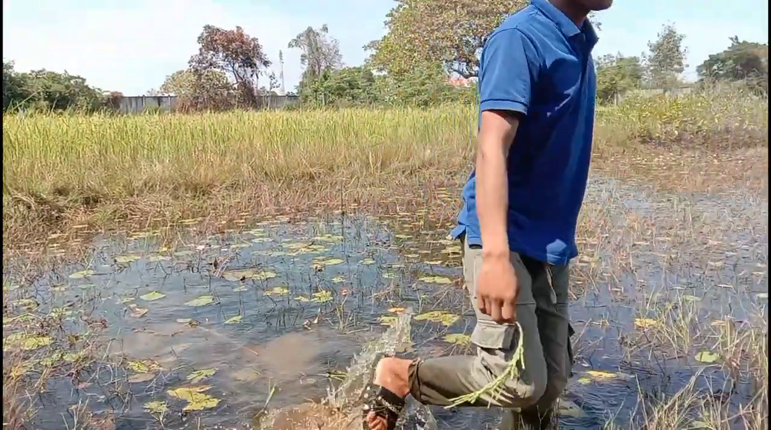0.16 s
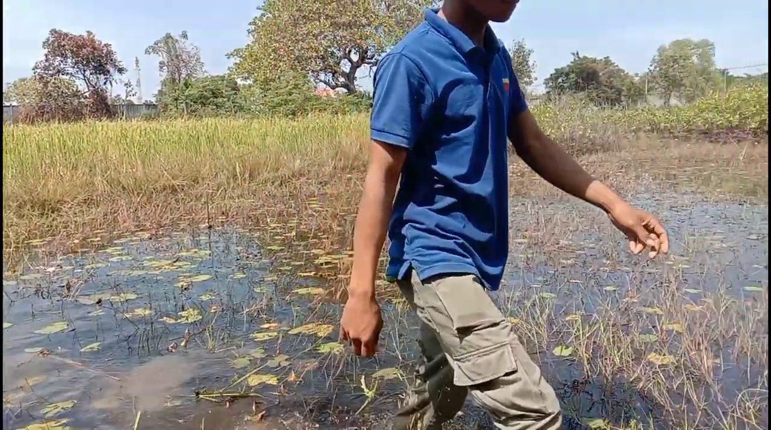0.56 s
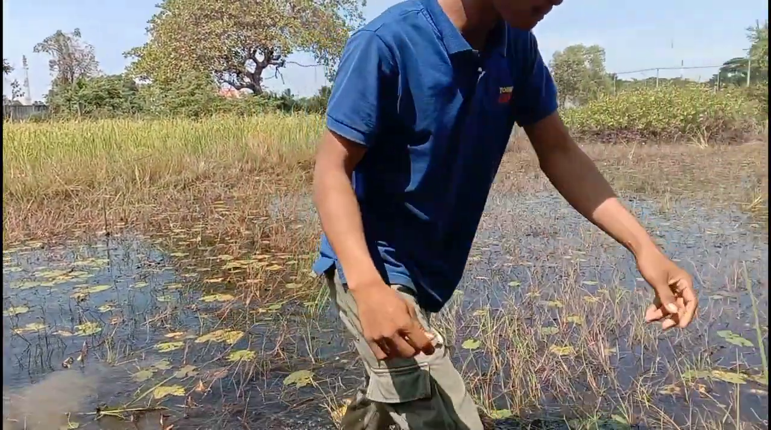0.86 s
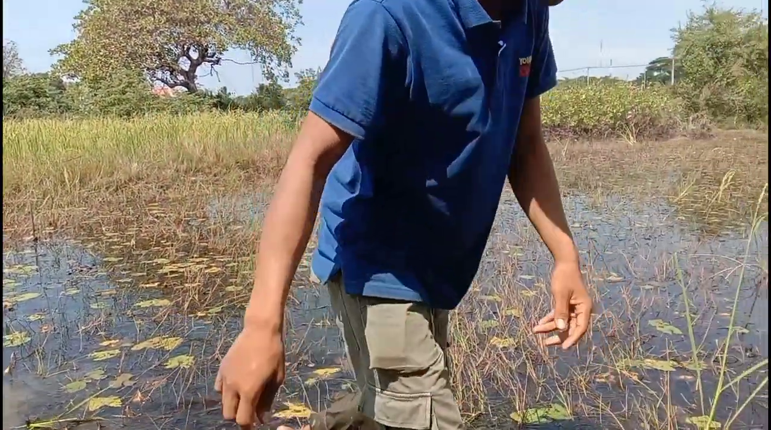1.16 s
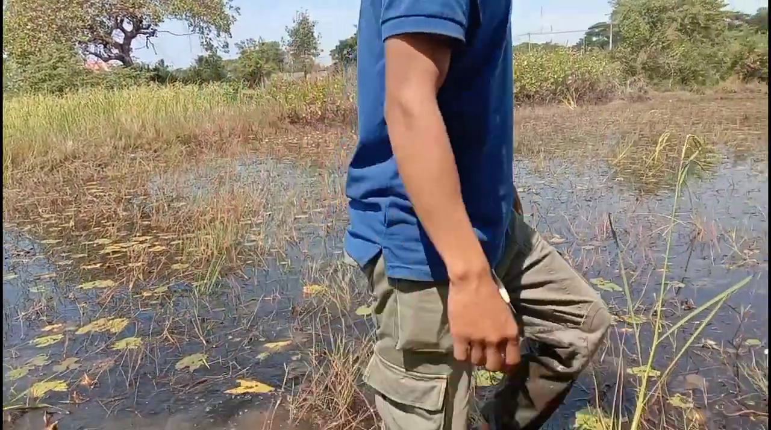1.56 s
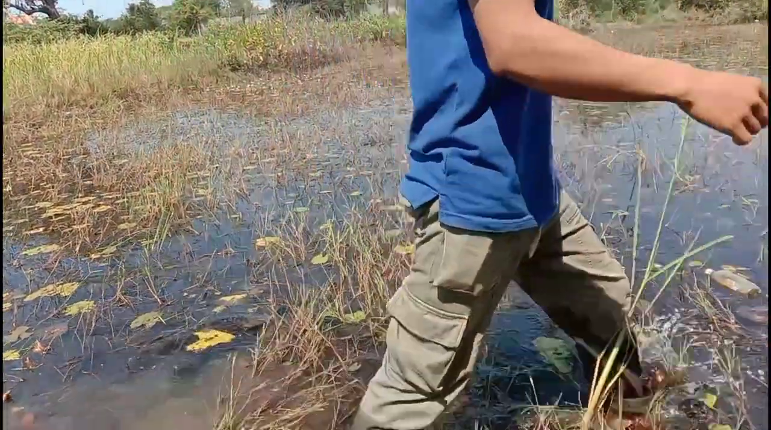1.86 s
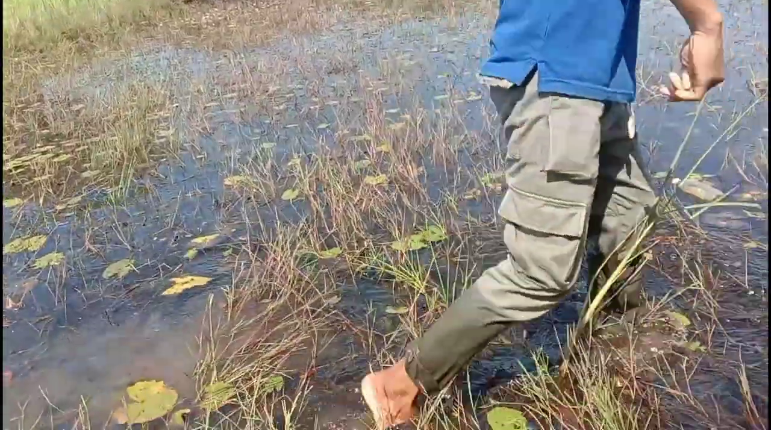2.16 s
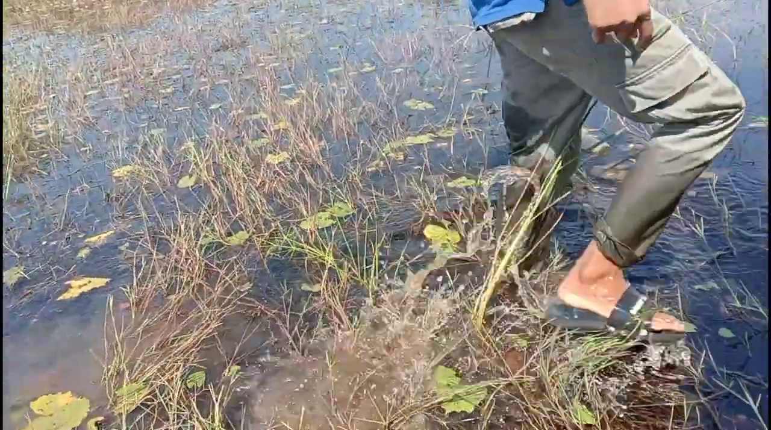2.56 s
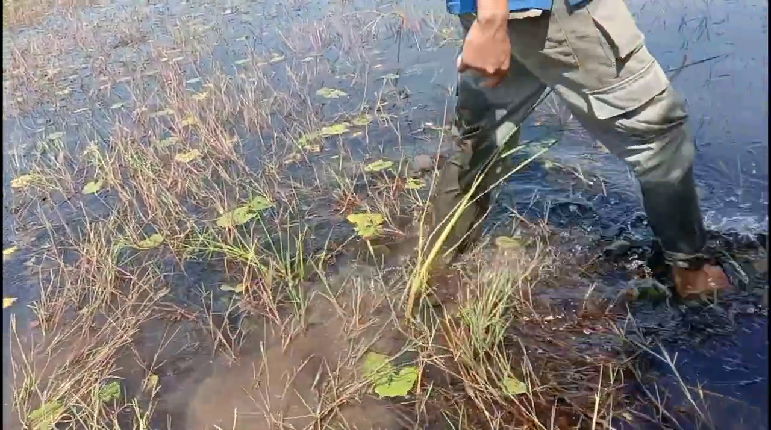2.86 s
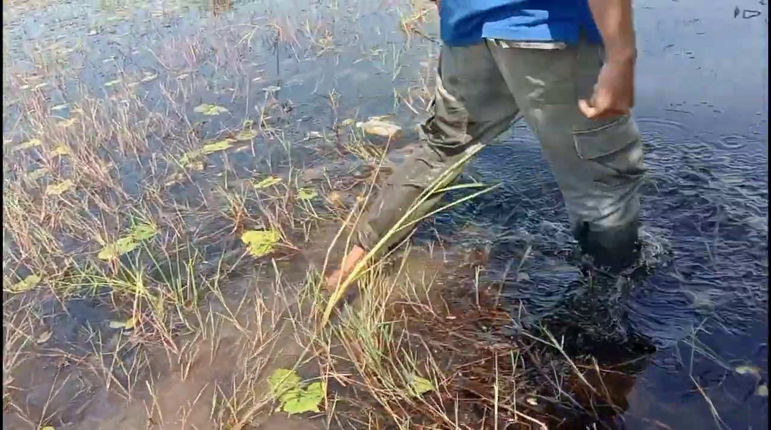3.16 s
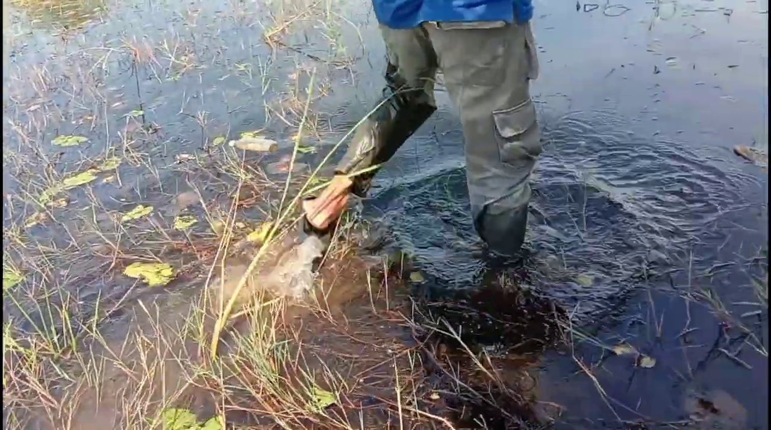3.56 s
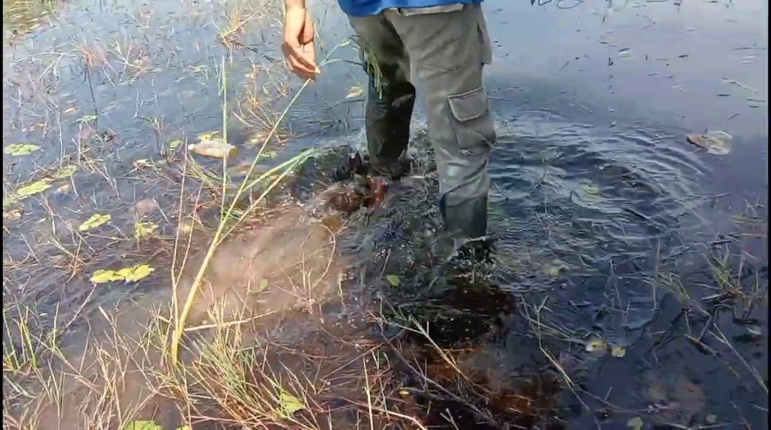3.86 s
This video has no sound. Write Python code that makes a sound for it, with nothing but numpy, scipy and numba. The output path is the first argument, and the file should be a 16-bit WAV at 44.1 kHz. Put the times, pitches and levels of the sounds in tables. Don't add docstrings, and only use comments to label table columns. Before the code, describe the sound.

Irregular wading splashes in a flooded grassy field: an early surge, smaller sloshes, then a strong bubbly plunge past the middle and lighter drips, heard a couple of metres away, dry and open, with slightly bright phone sound.

```python
import sys
import numpy as np
from scipy import signal
from scipy.fft import rfft, irfft
from scipy.io import wavfile
from scipy.ndimage import uniform_filter1d
from numba import njit

SR = 44100
rng = np.random.default_rng(int(sys.argv[2]) if len(sys.argv) > 2 else 0)


def to_linear_factor(level_db):
    exponent = np.asarray(level_db, float) / 20
    return 10 ** exponent


def persist_wave(psi):
    counts = np.round(np.clip(psi, -1, 1) * 32767).astype(np.int16)
    wavfile.write(sys.argv[1], SR, np.atleast_2d(counts).T)


N = 176400

# time_s, level_db
FLOW = [(0, -66), (0.108, -58), (.15, -40.5), (.45, -31.5), (.66, -38.5), (.8, -36), (.89, -40.5),
        (1.17, -37.5), (1.269, -47.5), (1.6, -32.5), (1.97, -39), (2.29, -45), (2.339, -38.5), (2.7, -30),
        (2.84, -35.5), (3.33, -44.5), (3.52, -47), (3.78, -33)]
# start_s, level_db, fade_db_per_s
PLUNGES = [(0, -51.5, 187), (0.113, -32.5, 27), (0.732, -34, 52), (.95, -42, 29), (1.296, -41, 14),
           (1.72, -35, 197), (1.94, -40, 100), (2.091, -38, 74), (2.314, -31, 35), (2.72, -42.5, 144),
           (2.97, -43, 16), (3.546, -38.5, 1)]
# start_s, peak_db, pitch_hz
GULPS = [(0.114, -27, 783), (0.129, -21, 852), (0.154, -25, 513), (0.242, -23, 610), (.66, -45, 910),
         (0.739, -22.5, 860), (0.761, -21.5, 900), (1.294, -35, 1040), (1.323, -31, 680), (1.474, -31, 456),
         (1.52, -26.5, 628), (1.681, -22.5, 950), (1.725, -22, 538), (1.744, -27, 618), (1.946, -19.5, 959),
         (2.096, -31.5, 795), (2.318, -17.5, 943), (2.337, -9.5, 686), (2.357, -10.5, 615.5),
         (2.378, -34, 810), (2.403, -22.5, 1070), (2.73, -19.5, 672), (2.774, -23.5, 713),
         (2.882, -34, 622), (3.226, -35.5, 890), (3.275, -28.5, 938), (3.515, -38, 850), (3.55, -28, 794),
         (3.594, -41, 502), (3.763, -22, 907), (3.826, -34, 351), (3.907, -24.5, 622)]
# start_s, peak_db, pitch_hz
PLINKS = [(0.073, -29.5, 1196), (.205, -22, 1250), (.25, -26, 1270), (.3, -16, 1250), (.34, -17, 1365),
          (.43, -20, 1370), (0.8972, -20.5, 1300), (1.0425, -18.5, 1270), (1.07, -22, 1300),
          (1.1945, -15, 1310), (1.41, -18, 1274), (1.435, -26, 1220), (1.555, -16.5, 1300),
          (1.7664, -13.5, 1245), (1.8725, -25, 1260), (1.921, -26, 1220), (1.954, -3.5, 1094),
          (1.9988, -11, 1165), (2.1077, -14, 1190), (2.2596, -22.5, 1380), (2.384, -17.5, 1235),
          (2.4228, -20.5, 1210), (2.49, -24, 1205), (2.545, -16.5, 1253), (2.973, -19.5, 1290),
          (3.1802, -20.5, 1200), (3.262, -21, 1160), (3.2923, -18.5, 1255), (3.3875, -16, 1085),
          (3.411, -17, 1104), (3.5011, -21.5, 1310), (3.6147, -21.5, 1270), (3.671, -13, 1350)]
# start_s, peak_db, pitch_hz
GLUGS = [(0.219, -45, 450), (0.36, -44, 438), (0.505, -44, 383), (0.91, -47, 375), (1.32, -45, 473),
         (1.548, -38, 456), (2.323, -23.5, 461), (2.465, -37, 485), (3.08, -44.5, 412), (3.252, -46, 345),
         (3.875, -41, 361), (3.963, -45.5, 447)]
# start_s, level_db, hold_s
SLAPS = [(0.476, -21, 0.0067), (0.49, -24, 0.019), (0.506, -28.5, 0.013), (0.524, -34.5, 0.058),
         (0.7, -45, 0.011), (0.74, -31.5, 0.015), (0.759, -28.5, 0.056), (0.826, -31.5, 0.019),
         (1.15, -52, 0.027), (1.452, -32.5, 0.0048), (1.671, -24, 0.022), (1.715, -26.5, 0.033),
         (1.954, -27.5, 0.026), (2.001, -27.5, 0.02), (2.091, -28.5, 0.014), (2.33, -39, 0.06),
         (2.409, -33.5, 0.022), (2.53, -33.5, 0.08), (2.727, -27.5, 0.026), (2.755, -28.5, 0.042),
         (3.005, -26, 0.0098), (3.051, -34.5, 0.063), (3.242, -40, 0.019), (3.28, -43.5, 0.04),
         (3.394, -37, 0.015), (3.756, -35.5, 0.02), (3.806, -27.5, 0.0084), (3.877, -54, 0.0052),
         (3.995, -52, .03)]
# start_s, peak_db, pitch_hz
DROPS = [(0.115, -19.5, 1650), (0.4784, -5.5, 1530), (0.4806, 1, 3090), (0.827, -15, 2740),
         (0.917, -19, 4070), (1.1643, -16, 3140), (1.411, -12.5, 4570), (1.594, -10, 3170),
         (1.6365, -13, 2640), (1.6784, -9, 1700), (1.71, -9, 2570), (1.9556, -13, 2070),
         (2.1209, -10.5, 3040), (2.344, -13, 1930), (2.5666, -5, 3300), (2.5905, -13, 3260),
         (2.918, -11.5, 6400), (2.9185, -9, 11900), (3.0069, -37, 1640), (3.0118, -3, 2700),
         (3.1686, -12.5, 4680), (3.296, -11.5, 4730), (3.4162, -13.5, 6700), (3.442, -24, 2700),
         (3.8833, -12, 1670)]
# start_s, peak_db, pitch_hz
TICKS = [(0.2804, -45, 5840), (0.424, -27, 5400), (0.453, -32, 5660), (0.514, -15.5, 5160),
         (0.7038, -24, 5270), (0.742, -28, 5340), (0.7647, -21.5, 4660), (0.9556, -34, 5070),
         (1.1287, -36, 5140), (1.29, -33.5, 4430), (1.311, -39, 5500), (1.3438, -38, 4650),
         (1.4544, -26, 4960), (1.498, -24.5, 5330), (1.537, -30, 4570), (1.6674, -17, 5490),
         (1.7696, -25, 6690), (1.8937, -28, 6000), (1.967, -19.5, 4560), (2.3336, -49, 6400),
         (2.4016, -38, 4760), (2.462, -41, 4660), (2.5384, -43, 5810), (2.613, -18, 6720),
         (2.7147, -37, 5600), (2.7327, -15.5, 5500), (2.8928, -26.5, 4800), (2.952, -31, 5160),
         (2.981, -26, 5240), (3.0824, -22, 5630), (3.248, -30, 5330), (3.3154, -49, 4840),
         (3.352, -29.5, 5500), (3.4042, -30, 6640), (3.4647, -38, 4640), (3.4732, -34, 5700),
         (3.5244, -40, 6230), (3.6564, -28, 4670), (3.681, -27, 4730), (3.733, -30, 4860),
         (3.7587, -29, 4950), (3.8184, -24, 6700), (3.884, -23.5, 4800), (3.954, -44, 5030)]
# freq_hz, gain_db
SPRAY_SPECTRUM = [(150, -45.5), (350, -12.5), (600, -12.5), (1200, -5), (3000, 3), (6000, -1), (10000, 1.5),
                  (16000, -15)]
# freq_hz, gain_db
FIELD_SPECTRUM = [(25, -41), (50, -10.5), (110, -3), (300, -16), (700, -29.5), (1300, -15), (4000, -37),
                  (15000, -46)]
# freq_hz, gain_db
MIC_RESPONSE = [(3500, -3.5), (4300, -5), (5600, -1), (6300, -5.5), (6900, -2), (8000, -15.5),
                (14200, -6.5), (15000, 5)]

GLIDE = 0.13
GULP_CYCLES, PLINK_CYCLES = 8.5, 8


def level(x, db):
    return x * to_linear_factor(db) / np.sqrt(np.mean(x ** 2))


def colour(x, points):
    hz, db = np.array(points, float).T
    bins_hz = np.arange(1, 4098) * SR / 8192
    log_gain = np.interp(np.log(bins_hz), np.log(hz), db) * np.log(10) / 20
    cepstrum = irfft(log_gain)
    cepstrum[1:4096] *= 2
    cepstrum[4097:] = 0
    impulse = irfft(np.exp(rfft(cepstrum)))
    return signal.fftconvolve(x, impulse)[:len(x)]


def walk(rate_hz):
    hold = int(SR / rate_hz)
    steps = np.repeat(rng.standard_normal(N // hold + 1), hold)
    return 1.3 * uniform_filter1d(uniform_filter1d(steps, hold), hold)[:N]


@njit
def ring(n, start_s, pitch_hz, cycles, size, glide, rise_cycles):
    out = np.zeros(n)
    for j in range(len(start_s)):
        i = int(start_s[j] * SR)
        turns = pitch_hz[j] / SR
        step = 2 * np.pi * turns
        decay = np.exp(-2 * turns / cycles[j])
        swell = np.exp(-turns / rise_cycles)
        up = 1 + glide[j] * turns / cycles[j]
        a, unswollen, phase = size[j], 1., 0.
        while i < n and a > .004 * size[j] and step < 3:
            phase += step
            step *= up
            a *= decay
            unswollen *= swell
            out[i] += a * (1 - unswollen) * np.sin(phase)
            i += 1
    return out


def swarm(count, lo_hz, hi_hz, cycles, scatter_db, rise):
    u = rng.random((count, 5)).T
    start_s = u[0] * N / SR
    pitch_hz = lo_hz * (hi_hz / lo_hz) ** u[1]
    size = to_linear_factor(-scatter_db * np.log(1.004 - u[3]))
    return level(ring(N, start_s, pitch_hz, cycles * (.5 + u[2]), size, GLIDE * 2 * u[4], rise), 0)


def spit(s, db, hz, spread_s):
    u = rng.random((len(s), 8, 3)).T
    late = -np.log(1.004 - u[0]) + 0.0036
    start_s = (s + spread_s * late).ravel()
    pitch_hz = np.minimum(hz * 2 ** (1.2 * u[1] - .5), .36 * SR).ravel()
    cycles = 3 + 11 * u[2].ravel() ** 2
    size = to_linear_factor(db - 2.3 * late).ravel()
    return ring(N, start_s, pitch_hz, cycles, size, GLIDE + 0 * pitch_hz, 0.28)


def wading(t):
    flow_db = np.interp(t, *np.array(FLOW, float).T)
    hiss_db = -11 + walk(60) + 3.6 * walk(150)
    hiss = to_linear_factor(hiss_db) * level(colour(rng.standard_normal(N), SPRAY_SPECTRUM), 0)
    crackle = swarm(count=5000, lo_hz=2400, hi_hz=15600, cycles=5, scatter_db=2.8, rise=0.4)
    crackle = level(colour(crackle, SPRAY_SPECTRUM), -13.5)
    u = rng.random((700, 3)).T
    patter = spit(u[0] * N / SR, -3.2 * np.log(1.004 - u[1]), 1800 * 7 ** u[2], spread_s=.003)
    patter = level(colour(patter, SPRAY_SPECTRUM), -10.5)
    fizz = swarm(count=3200, lo_hz=1400, hi_hz=7560, cycles=11, scatter_db=2.8, rise=0.8)
    fizz *= to_linear_factor(-6.5 + 1.15 * walk(35))
    drips = to_linear_factor(-8) * swarm(count=900, lo_hz=1710, hi_hz=8950, cycles=20, scatter_db=3.0, rise=1.5)
    gurgle = swarm(count=1400, lo_hz=749, hi_hz=1980, cycles=7.0, scatter_db=-2.5, rise=0.68)
    gurgle *= to_linear_factor(-9 + 2.8 * walk(30.41))
    brighten = to_linear_factor(.42 * (flow_db + 42.5))
    return to_linear_factor(flow_db + 2.5) * (brighten * (hiss + crackle + patter) + fizz + drips + gurgle)


def churn(t):
    s, db, fade = np.array(PLUNGES, float).T
    k = np.searchsorted(s, t, "right") - 1
    env = uniform_filter1d(to_linear_factor(db[k] - fade[k] * (t - s[k])), size=300)
    return env * swarm(count=600, lo_hz=450, hi_hz=1100, cycles=11, scatter_db=2.5, rise=1.3)


def air_pockets(table, cycles, gain_db, brood_db):
    s, db, hz = np.array(table, float).T
    u = rng.random((len(s), 4, 3)).T
    brood_s = (s + u[0] * 1.2 * cycles / hz).ravel()
    brood_hz = (hz * 2 ** (1.795 * u[1] - .5)).ravel()
    brood_size = to_linear_factor(db + brood_db - 10.8 * u[2]).ravel()
    same = 0 * brood_s
    brood = ring(N, brood_s, brood_hz, 0.95 * cycles + same, brood_size, GLIDE + same, 0.37)
    parents = ring(N, s, hz * 0.961, cycles + 0 * s, to_linear_factor(db), GLIDE + 0 * s, 1.3)
    return to_linear_factor(gain_db) * (parents + brood)


def bubbles():
    gulps = air_pockets(GULPS, GULP_CYCLES, gain_db=5.5, brood_db=-5.0)
    plinks = air_pockets(PLINKS, PLINK_CYCLES, gain_db=-5.0, brood_db=-4.0)
    glugs = air_pockets(GLUGS, GULP_CYCLES, gain_db=10.5, brood_db=-4.5)
    return gulps + plinks + glugs


def slaps(t):
    attack_s, release_s = 0.00048, 0.0093
    env = np.zeros(N)
    for s, db, hold_s in SLAPS:
        attack = np.clip((t - s) / attack_s, 0, 1)
        release = np.exp(-np.maximum(t - s - hold_s, 0) / release_s)
        env += to_linear_factor(db) * attack * release
    grains = swarm(count=9000, lo_hz=478, hi_hz=12800, cycles=2.1, scatter_db=2.5, rise=0.081)
    water = colour(grains + .5 * rng.standard_normal(N), SPRAY_SPECTRUM)
    return env * to_linear_factor(2.2 * walk(160)) * level(water, 0)


def drops():
    s, db, hz = np.array(DROPS, float).T
    strike = ring(N, s, hz, 3.5 + 0 * s, to_linear_factor(db), GLIDE + 0 * s, 0.2)
    return to_linear_factor(-3.5) * strike + spit(s, db - 10.5, hz, spread_s=0.001)


def ticks():
    s, db, hz = np.array(TICKS, float).T
    return spit(s, db + 1.5, hz, spread_s=.0015) + spit(s, db - 7.5, 1.77 * hz, spread_s=.0012)


def field():
    hum_hz, width_hz = 67.1, 9.1
    peak = signal.iirpeak(2 * hum_hz / SR, hum_hz / width_hz)
    hum = signal.lfilter(*peak, signal.lfilter(*peak, rng.standard_normal(N)))
    floor = colour(rng.standard_normal(N), FIELD_SPECTRUM) * to_linear_factor(2 * walk(4.49))
    return level(hum, -53.5) + level(floor, -50)


def scene():
    t = np.arange(N) / SR
    water = wading(t) + churn(t) + bubbles() + slaps(t) + drops() + ticks()
    return (water + field())[None]


def low_pass(x):
    return signal.sosfilt(signal.butter(12, 16490, fs=SR, output="sos"), x)


def record(dry):
    case_hz, case_width_hz, case_db = 1270, 80, 7
    case = signal.iirpeak(2 * case_hz / SR, case_hz / case_width_hz)
    x = dry[0] + to_linear_factor(case_db) * signal.lfilter(*case, dry[0])
    x = colour(x, MIC_RESPONSE)
    x = signal.sosfilt(signal.ellip(8, .2, 45, 15650, fs=SR, output="sos"), x)
    x = signal.sosfilt(signal.butter(2, 38, "high", fs=SR, output="sos"), x)
    return low_pass(x[None])


dry = scene()
out = record(dry)
persist_wave(out)
```